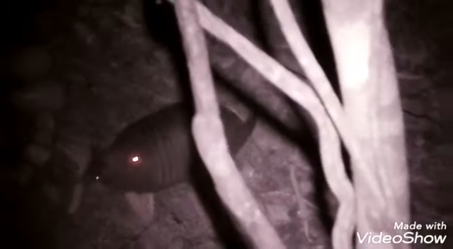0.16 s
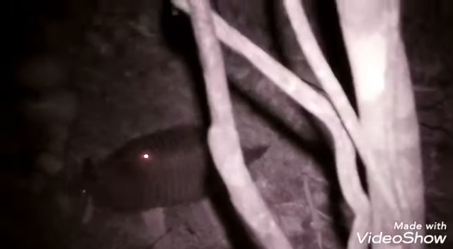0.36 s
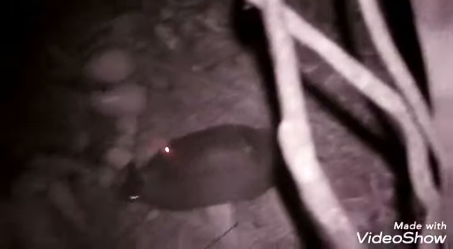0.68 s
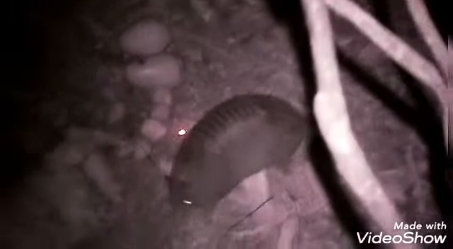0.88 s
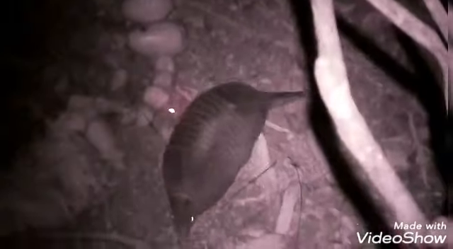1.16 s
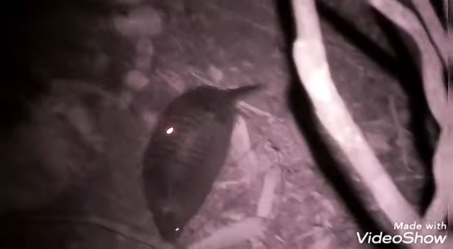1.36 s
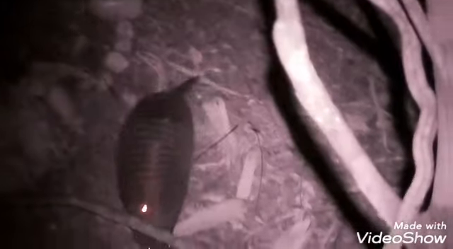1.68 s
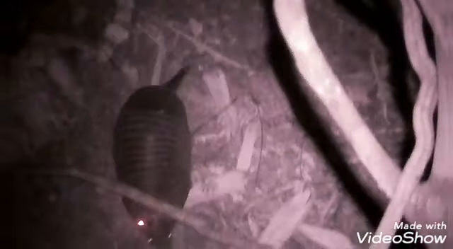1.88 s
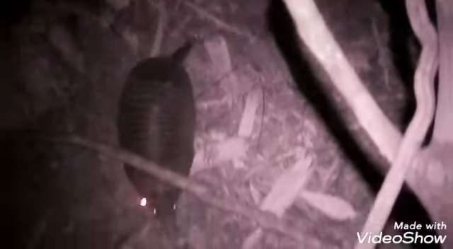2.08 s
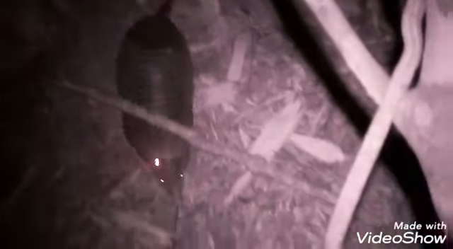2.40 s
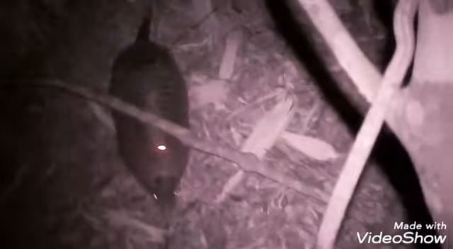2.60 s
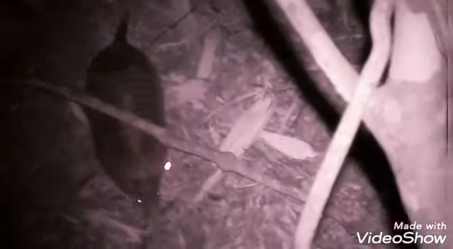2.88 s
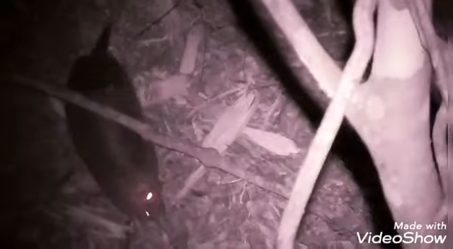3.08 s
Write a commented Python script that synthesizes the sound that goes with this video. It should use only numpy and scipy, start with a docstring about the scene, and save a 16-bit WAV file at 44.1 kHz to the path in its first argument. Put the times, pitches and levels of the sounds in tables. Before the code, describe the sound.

Crickets chirp fast and high at night over a distant chorus of trilling insects.

```python
"""Two near crickets chirp in pairs of wing strokes near 4 kHz, over a far crowd in night scrub.
Each stroke is a short tone that swells and sags in pitch. Other crickets trill higher up; small callers
peep and lisp. Far frogs and a bush cricket are pulsed bands of noise. An animal noses through leaf litter
in clumps of tiny cracks. Under it all: a low wash of air, hiss, insect haze and a faint hum."""
import sys
import numpy as np
from scipy import signal
from scipy.fft import rfft, irfft
from scipy.io import wavfile

SR = 44100
rng = np.random.default_rng(int(sys.argv[2]) if len(sys.argv) > 2 else 0)


def pcm_store(signal):
    """Save signal as 16-bit PCM."""
    levels = np.round(np.clip(np.atleast_2d(signal), -1, 1) * 32767)
    wavfile.write(sys.argv[1], SR, levels.astype(np.int16).T)


N = 143325

# air spectrum: freq_hz, density_db
AIR_SPECTRUM = [(15, -1.5), (31, -2.5), (45, -6), (100, -10.5), (180, -13), (290, -9), (400, -14.5),
                (700, -14.5), (1200, -21), (1800, -27.5), (4000, -49.5), (16000, -66)]
# air level: time_s, level_db
AIR_ENVELOPE = [(0, -56), (.22, -56), (.3, -59), (.7, -57.5), (1.2, -55), (1.65, -59), (2.3, -59.5),
                (3.25, -60.5)]
# hiss spectrum: freq_hz, density_db
HISS_SPECTRUM = [(300, 4.5), (2000, -1), (3000, 2), (6000, 0.5), (9000, -2), (11000, 1), (13500, -1),
                 (15500, 1.5)]
# farthest insects: centre_hz, width_hz, level_db
HAZE_BANDS = [(2170, 380, -73.5), (3892, 220, -53), (7860, 620, -69), (10010, 250, -78), (11730, 800, -72)]
# steady tones: pitch_hz, level_db
HUM_TONES = [(238.6, -75.5), (476.7, -77.5), (653.7, -80.5)]
# trills: start_s, end_s, pitch_hz, level_db, strokes_per_s, sag_hz, rise_hz
TRILL_BOUTS = [(0.1, 2.2, 4620, -55.5, 28.1, 67, 228), (.75, 1.7, 4960, -49.5, 37, 260, 40),
               (2.45, 3.4, 4990, -51, 39, 270, 30), (-1.75, 3.4, 5030, -55.5, 34.4, 404, -5),
               (-4.5, 3.6, 4440, -64.5, 24, 90, 38)]
# far crickets: pitch_hz, level_db
CROWD_VOICES = [(3670, -54.5), (3740, -55.5), (3800, -50), (3840, -53.5), (3885, -46), (3940, -48.5),
                (3975, -43.5)]
# looser near cricket: first_stroke_s, level_db
LOOSE_CHIRPS = [(.004, -33), (.112, -33.5), (.214, -33.5), (.319, -32.5), (.416, -33.5), (0.523, -33),
                (.624, -34), (.733, -35), (0.841, -36), (.945, -38), (1.48, -33.5), (1.582, -34.5),
                (1.683, -30.5), (1.783, -34.5), (1.89, -35.5), (1.996, -33), (2.101, -31), (2.199, -31),
                (2.304, -33.5), (2.4, -33.5), (2.555, -37.5), (2.661, -36), (2.761, -32.5), (2.866, -43.5),
                (2.969, -35), (3.069, -34.5), (3.17, -34.5)]
# high triller: time_s, strokes_per_s
TRILL_PACE = [(0, 37.75), (0.2, 35), (0.7, 31), (1.33, 32), (1.45, 41.95), (1.9, 40.4), (2.4, 36.4),
              (3.25, 32.5)]
# leaf rustles: start_s, length_s, level_db
LEAF_RUSTLES = [(.09, .06, -61.5), (0.192, .03, -64), (.372, .015, -61), (.43, .04, -61),
                (.62, 0.07, -60.5), (0.813, 0.045, -62), (1.136, .03, -59.5), (1.219, 0.066, -62),
                (1.78, .15, -66), (2.134, 0.039, -67), (2.737, 0.091, -60.5)]
# leaf crack spectrum: freq_hz, density_db
LEAF_SPECTRUM = [(800, -17), (2500, -11), (6000, 4), (9000, 4), (12000, 4), (16000, -22)]
# small insect: start_s, level_db
INSECT_LISPS = [(0.0997, -64), (0.1974, -59), (0.404, -56), (0.5057, -57), (0.6105, -59), (0.7048, -56),
                (0.8435, -60), (0.9113, -67), (1.0141, -67), (1.1408, -69), (1.3234, -60), (1.4321, -61),
                (1.8183, -57), (1.9505, -63), (2.1954, -64), (2.5366, -58), (2.7142, -61), (2.8482, -66)]
# double peeps: first_peep_s, pitch_hz, level_db
PEEP_PAIRS = [(.525, 3305, -54.5), (1.33, 3020, -64), (1.775, 2985, -63), (2.41, 2980, -60),
              (2.83, 2997, -61.5), (2.851, 3304, -51.5)]
# far frogs: start_s, length_s, level_db
FROG_RATTLES = [(.3, 0.32, -70), (1.0, .4, -74), (1.74, 0.43, -70.5), (2.42, 0.49, -70.5)]
# bush cricket: start_s, length_s, level_db
BUSH_BUZZES = [(.38, .54, -68.5)]


def amp(db):
    """Decibels to gain."""
    return 10 ** (np.asarray(db) / 20)


def unit(x):
    """Scale to rms 1."""
    return x / np.sqrt(np.mean(x ** 2) + 1e-20)


def add(mix, start_s, sound):
    """Mix in at start_s; drop what falls outside."""
    at = round(start_s * SR)
    sound = sound[max(-at, 0):]
    part = mix[max(at, 0):][:len(sound)]
    part += sound[:len(part)]


def colour(x, spectrum):
    """Filter by (freq_hz, gain_db) points."""
    hz, db = np.transpose(spectrum)
    bins_hz = np.fft.rfftfreq(len(x), 1 / SR)
    gain = amp(np.interp(np.log(bins_hz + 1), np.log(hz), db))
    return irfft(rfft(x) * gain, len(x))


def band(centre_hz, width_hz):
    """Noise in a bell-shaped band, rms 1."""
    offset = (np.fft.rfftfreq(N, 1 / SR) - centre_hz) / width_hz
    return unit(irfft(rfft(rng.standard_normal(N)) * np.exp(-2 * offset ** 2), N))


def background():
    """Low wash of air, even hiss, far insect haze, faint hum."""
    t = np.arange(N) / SR
    air_gain = amp(np.interp(t, *np.transpose(AIR_ENVELOPE)))
    air = air_gain * unit(colour(rng.standard_normal(N), AIR_SPECTRUM))
    hiss = amp(-60) * unit(colour(rng.standard_normal(N), HISS_SPECTRUM))
    haze = sum(amp(db) * band(hz, width_hz) for hz, width_hz, db in HAZE_BANDS)
    hum = sum(amp(db) * unit(np.sin(2 * np.pi * (hz * t + rng.random()))) for hz, db in HUM_TONES)
    return air + hiss + haze + hum


def stroke(centre_s, length_s, pitch_hz, level_db, sag_hz, overtones_db=()):
    """Wing stroke or peep: a tone swells, sags and fades. Returns start_s, sound."""
    progress = np.linspace(0, 1, max(int(length_s * SR), 2))
    scatter_db, scatter_hz, start_turns = rng.standard_normal(3) * (1.07, 10.3, 1)
    wobble = .004 * np.interp(progress, np.linspace(0, 1, 8), rng.standard_normal(8))
    sweep_hz = pitch_hz * (1 + wobble) + scatter_hz + sag_hz * (.5 - progress)
    phase = 2 * np.pi * (np.cumsum(sweep_hz) / SR + start_turns)
    tone = np.sin(phase) + sum(amp(db) * np.sin(k * phase) for k, db in enumerate(overtones_db, 2))
    swell = abs(np.sin(np.pi * progress)) ** 1.23
    return centre_s - length_s / 2, amp(level_db + scatter_db) * swell * tone


def trill_bouts(duty=.72, fade_s=.12, warm_up_s=.16):
    """Trills fade in and settle on pitch as the wings warm up."""
    out = np.zeros(N)
    for start_s, end_s, hz, db, strokes_per_s, sag_hz, rise_hz in TRILL_BOUTS:
        for age_s in np.arange(0, end_s - start_s, 1 / strokes_per_s):
            pitch_hz = hz - rise_hz * np.exp(-age_s / warm_up_s)
            at_s, sound = stroke(start_s + age_s, duty / strokes_per_s, pitch_hz, db, sag_hz,
                                 overtones_db=(-21.5, -34))
            add(out, at_s, sound * min(age_s / fade_s, 1))
    return out


def cricket_crowd(chirps=36, period_s=.107, gap_s=.03):
    """Far crickets, three strokes a chirp, each on its own pitch and beat."""
    out = np.zeros(N)
    for hz, db in CROWD_VOICES:
        intervals = rng.uniform(.95, 1.05) + rng.normal(0, .03, chirps)
        beats = np.cumsum(intervals) - 2 - rng.random()  # already under way at 0 s
        for chirp_s in beats * period_s:
            for k in range(3):
                add(out, *stroke(chirp_s + k * gap_s, length_s=.022, pitch_hz=hz, level_db=db,
                                 sag_hz=109, overtones_db=(-27, -24.5)))
    return out


def steady_cricket(first_s=-.0695, period_s=.1045, gap_s=.034):
    """Near cricket: stroke pairs in strict time."""
    out = np.zeros(N)
    for chirp_s in np.arange(first_s, N / SR, period_s):
        for centre_s in (chirp_s, chirp_s + gap_s):
            add(out, *stroke(centre_s, length_s=.027, pitch_hz=4113, level_db=-37.5,
                             sag_hz=40.4, overtones_db=(-24, -25)))
    return out


def loose_cricket(gap_s=.031):
    """Its neighbour: slightly lower stroke pairs that drift in and out of step with it."""
    out = np.zeros(N)
    for chirp_s, db in LOOSE_CHIRPS:
        for centre_s in (chirp_s, chirp_s + gap_s):
            add(out, *stroke(centre_s, length_s=.026, pitch_hz=4006, level_db=db,
                             sag_hz=49.4, overtones_db=(-36, -33.5)))
    return out


def high_triller():
    """Unbroken trill of falling sweeps; hurries in the middle."""
    out = np.zeros(N)
    strokes_per_s = np.interp(np.arange(N) / SR, *np.transpose(TRILL_PACE))
    turns = np.cumsum(strokes_per_s) / SR + .28
    for centre_s in np.flatnonzero(np.diff(np.floor(turns))) / SR:
        add(out, *stroke(centre_s, length_s=.022, pitch_hz=5196, level_db=-50.5, sag_hz=498))
    return out


def leaf_litter(cracks_per_s=2500):
    """Clumps of tiny cracks as an animal pushes dry litter aside."""
    t = np.arange(N) / SR
    sizes = rng.standard_normal(N) * amp(-1.5 * np.minimum(rng.exponential(1, N), 3))
    cracks = sizes * (rng.random(N) < cracks_per_s / SR)
    envelope = sum(amp(db) * np.sin(np.pi * np.sqrt(np.clip((t - start_s) / length_s, 0, 1)))
                   for start_s, length_s, db in LEAF_RUSTLES)
    return envelope * unit(colour(cracks, LEAF_SPECTRUM))


def small_callers(peep_gap_s=.068, lisp_s=.016, lisp_trim_db=-1):
    """Double peeps below the chorus, short lisps above it."""
    out = np.zeros(N)
    for first_s, hz, db in PEEP_PAIRS:
        for centre_s in (first_s, first_s + peep_gap_s):
            add(out, *stroke(centre_s, length_s=.03, pitch_hz=hz, level_db=db, sag_hz=80))
    for start_s, db in INSECT_LISPS:
        add(out, *stroke(start_s + lisp_s / 2, lisp_s, pitch_hz=6920, level_db=db + lisp_trim_db,
                         sag_hz=456))
    return out


def rattles(calls, centre_hz, width_hz, pulses_per_s):
    """Frog or bush cricket: fast pulse trains in one narrow resonance."""
    t = np.arange(N) / SR
    envelope = sum(amp(db) * np.sqrt(np.maximum(1 - (2 * (t - start_s) / length_s - 1) ** 2, 0))
                   for start_s, length_s, db in calls)
    pulses = 1 + np.sin(2 * np.pi * pulses_per_s * t)
    return envelope * unit(band(centre_hz, width_hz) * pulses)


def scrub(x, wet_db, t60_s=.24):
    """Short, sparse scatter off ground and bushes."""
    t = np.arange(SR // 2) / SR
    taps = rng.standard_normal(len(t)) * (rng.random(len(t)) < .05) * amp(-60 * t / t60_s)
    wet = unit(signal.fftconvolve(x, taps)[:N]) * np.std(x)
    return (x + amp(wet_db) * wet) / np.sqrt(1 + amp(wet_db) ** 2)


def scene():
    """Mono mix: near singers fairly dry, the far crowd blurred by scrub."""
    mix = background() + leaf_litter()
    mix += rattles(FROG_RATTLES, centre_hz=2104, width_hz=99, pulses_per_s=52)
    mix += rattles(BUSH_BUZZES, centre_hz=9890, width_hz=350, pulses_per_s=81)
    mix += scrub(steady_cricket() + loose_cricket(), wet_db=-5)
    mix += scrub(small_callers(), wet_db=-4)
    mix += scrub(cricket_crowd(), wet_db=.5)
    mix += scrub(high_triller(), wet_db=-3)
    mix += scrub(trill_bouts(), wet_db=-8)
    return mix[None]


def record(dry):
    """Steep low-pass."""
    cutoff_hz = 15850
    taps = signal.firwin(801, cutoff_hz, window=("kaiser", 9), fs=SR)
    return signal.oaconvolve(dry, taps[None], "same")


dry = scene()
out = record(dry)
pcm_store(out)
```